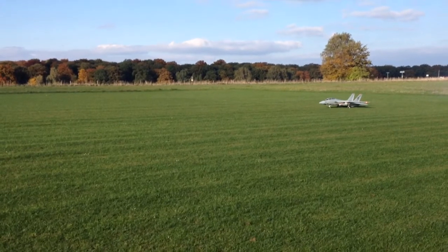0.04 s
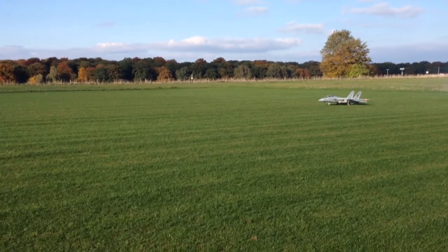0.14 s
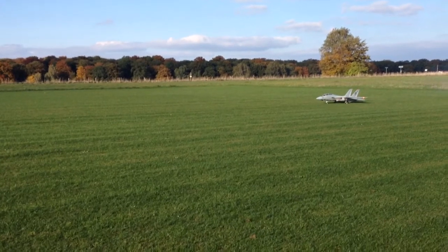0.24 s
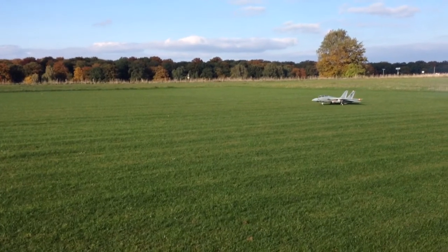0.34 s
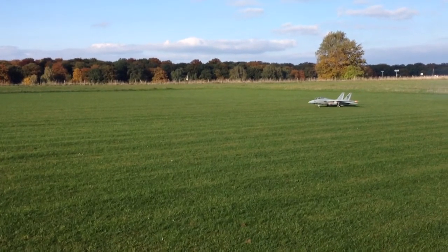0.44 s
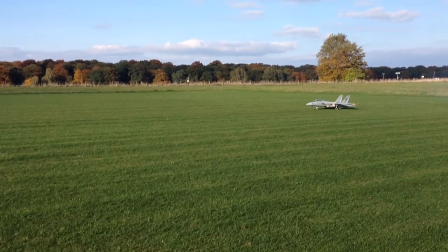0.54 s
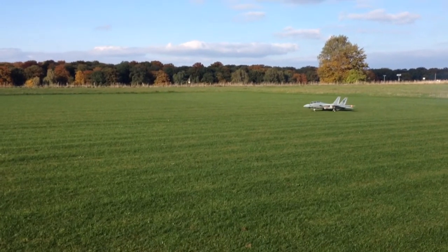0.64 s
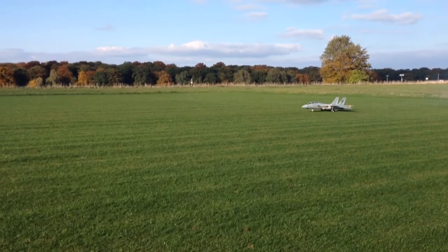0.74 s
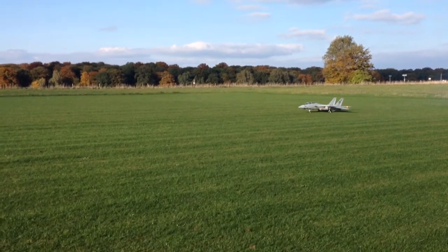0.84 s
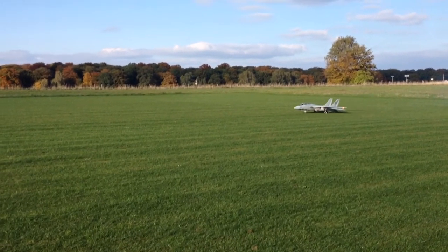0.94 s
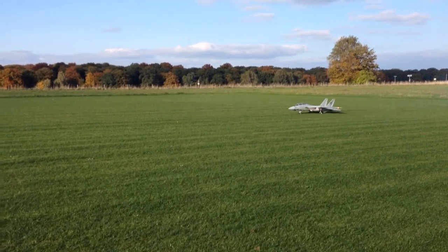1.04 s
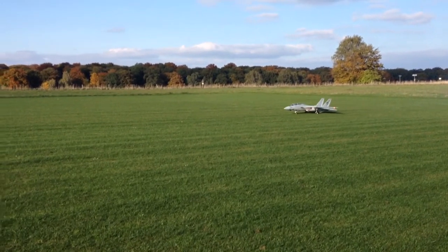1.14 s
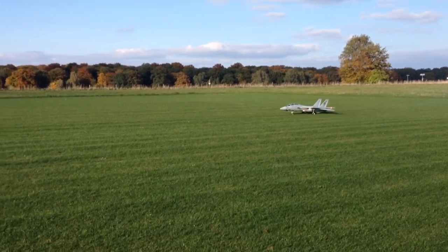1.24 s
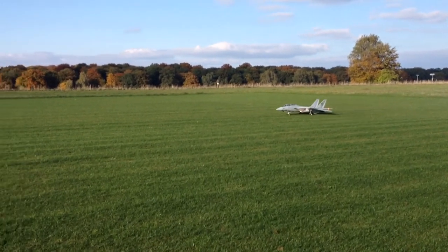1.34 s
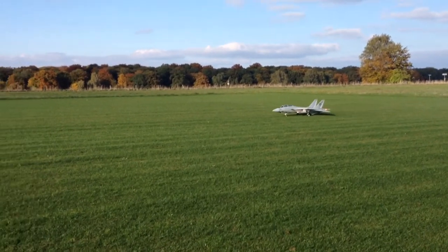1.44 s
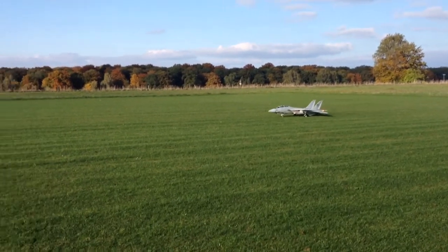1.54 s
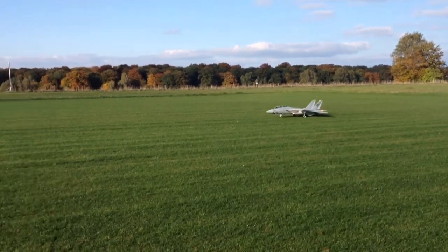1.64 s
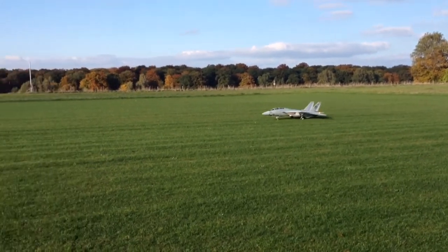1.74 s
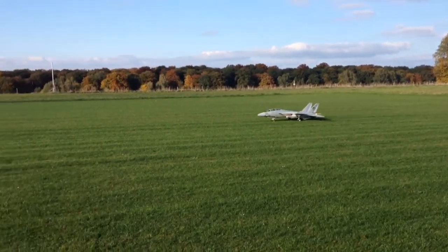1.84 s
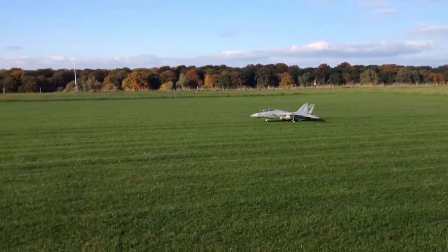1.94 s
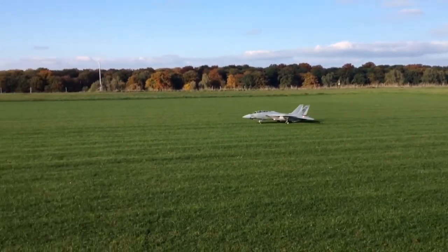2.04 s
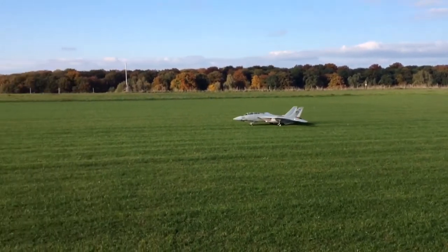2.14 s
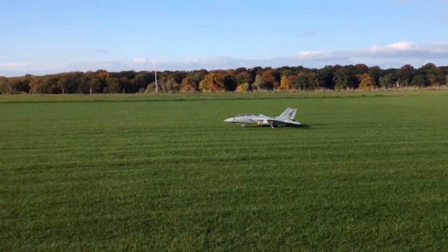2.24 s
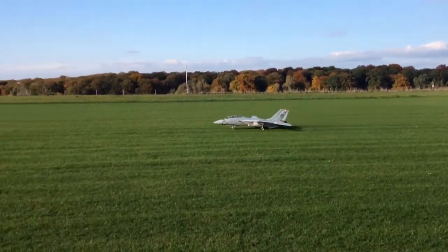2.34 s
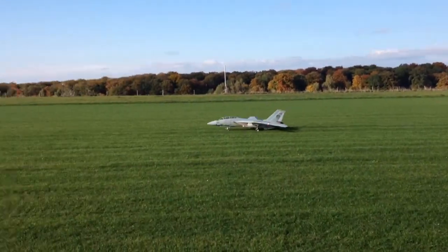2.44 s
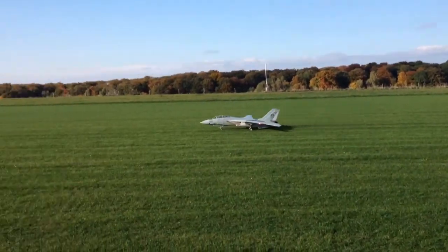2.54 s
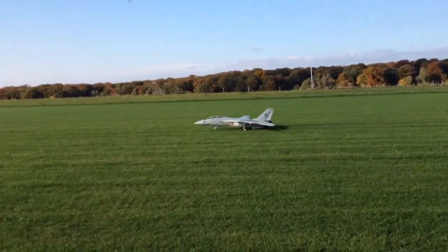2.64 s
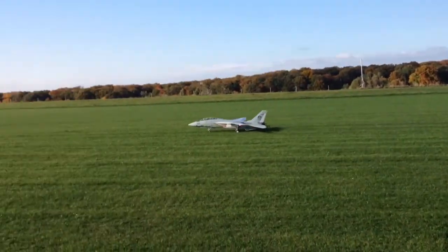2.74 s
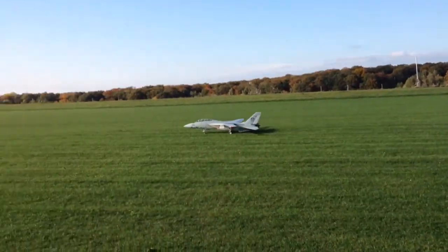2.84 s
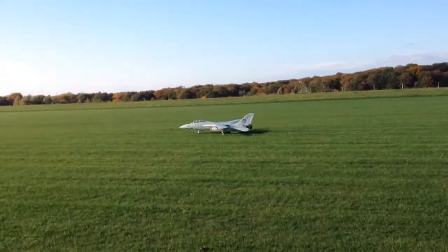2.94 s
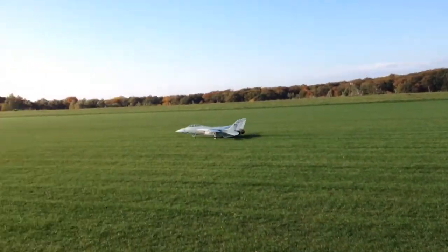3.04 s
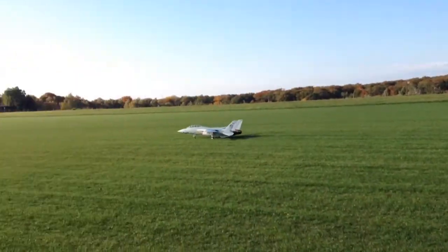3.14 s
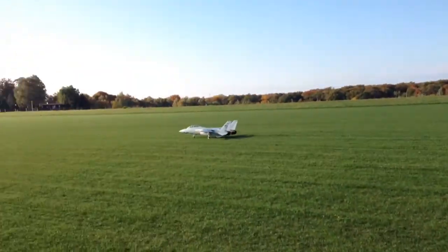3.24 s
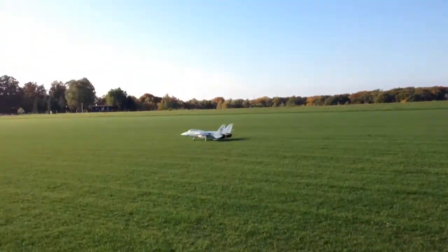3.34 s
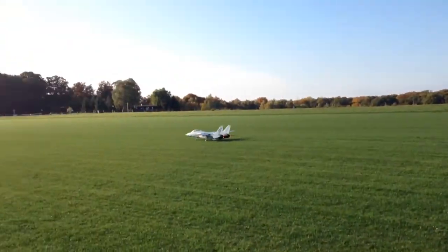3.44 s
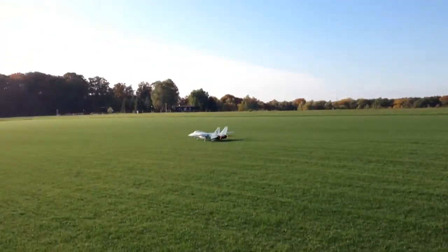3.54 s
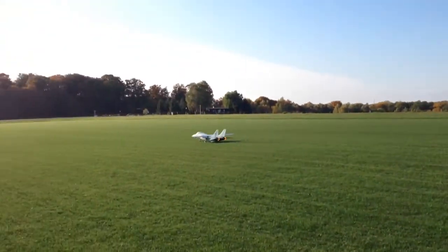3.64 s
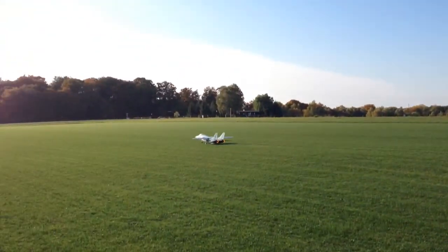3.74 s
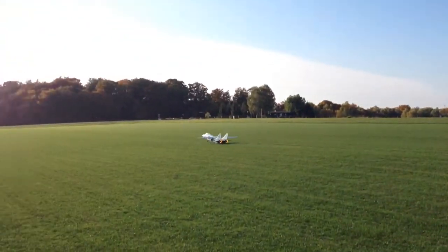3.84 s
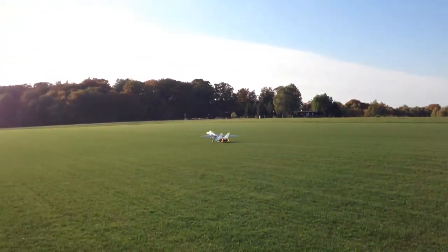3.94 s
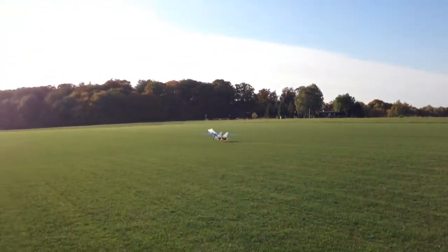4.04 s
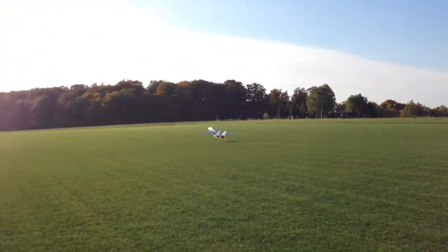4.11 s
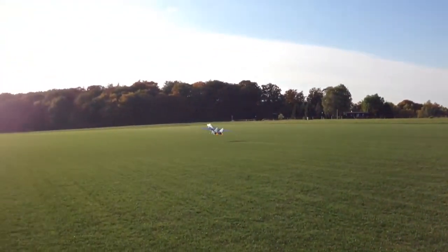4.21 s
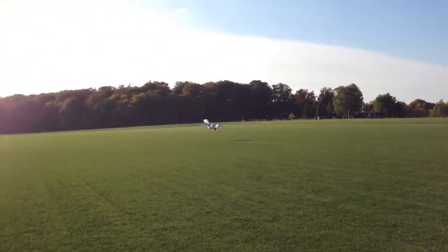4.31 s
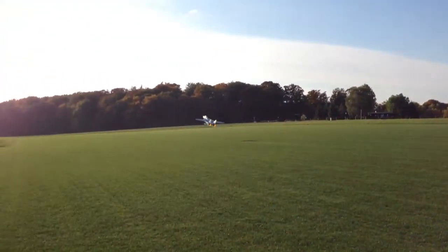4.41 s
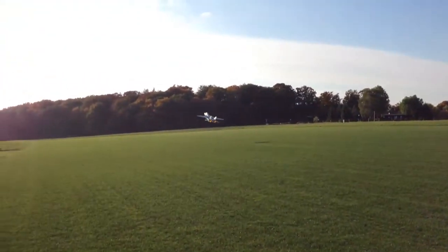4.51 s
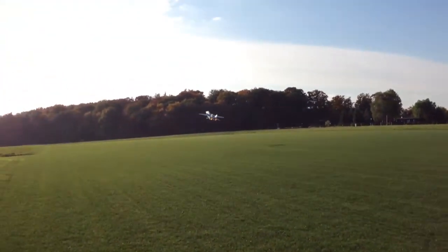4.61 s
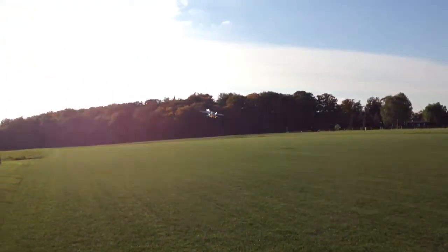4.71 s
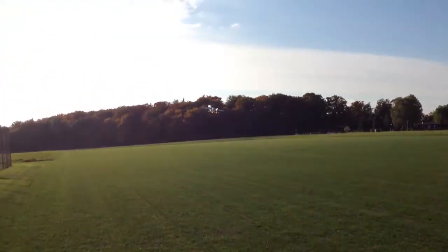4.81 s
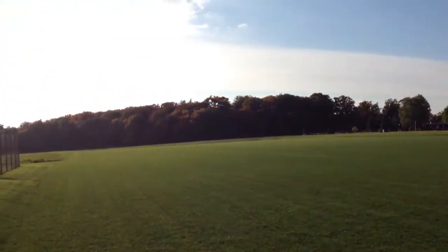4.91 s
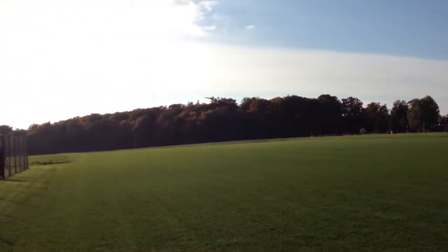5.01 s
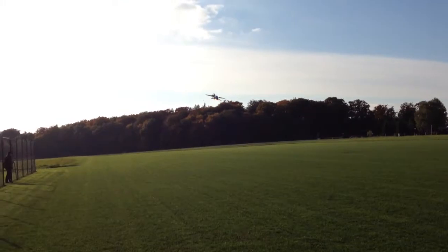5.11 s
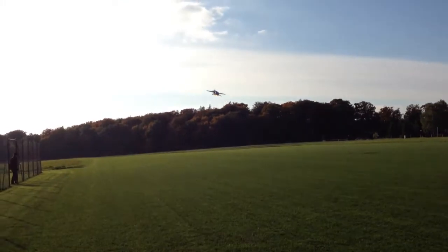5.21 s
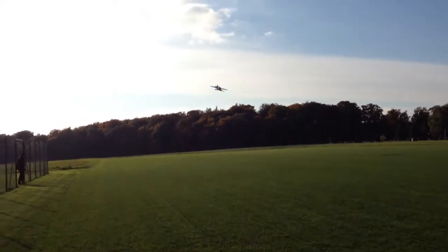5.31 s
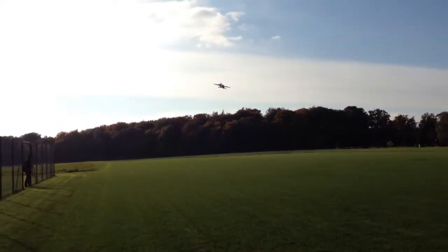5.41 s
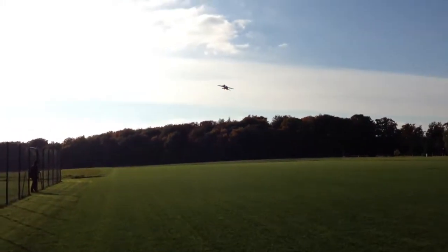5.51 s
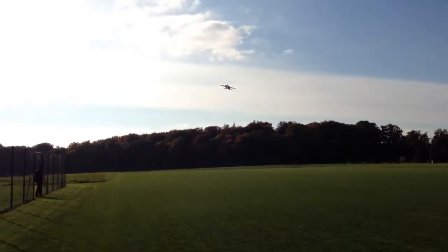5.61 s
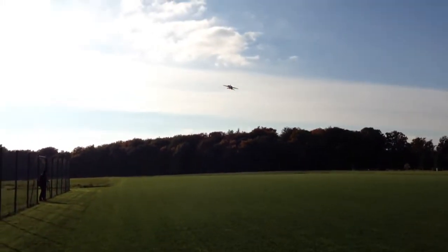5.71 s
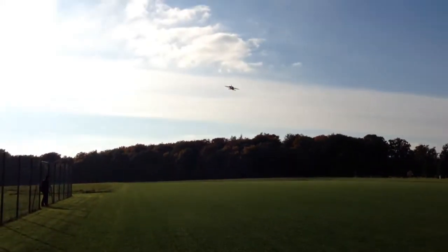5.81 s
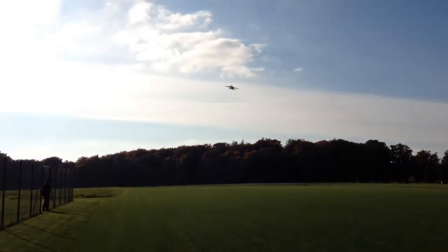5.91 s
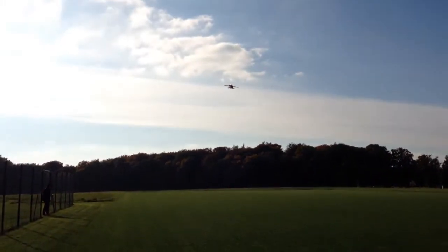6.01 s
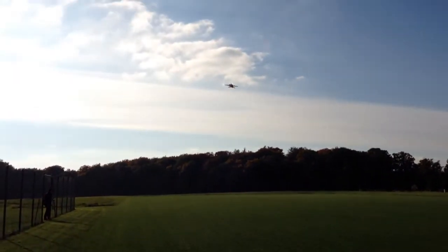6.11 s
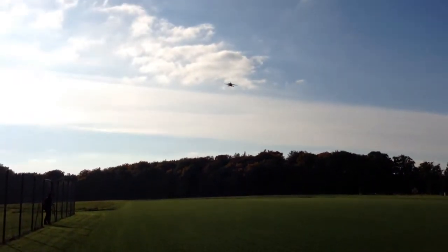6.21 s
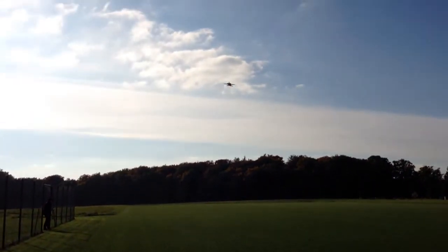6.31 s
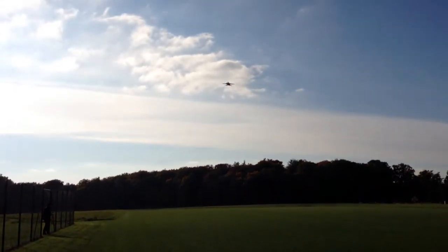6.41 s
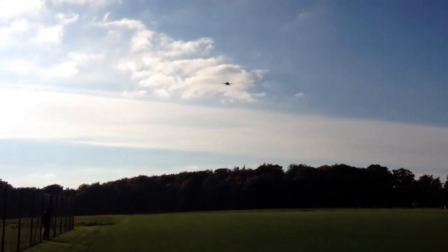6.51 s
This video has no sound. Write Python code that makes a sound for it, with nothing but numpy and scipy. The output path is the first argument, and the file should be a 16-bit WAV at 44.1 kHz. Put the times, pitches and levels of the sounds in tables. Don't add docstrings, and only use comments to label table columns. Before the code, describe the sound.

At 0 s a small twin-turbine model jet is already running on open grass: a dense airy hiss over a modest exhaust rumble, with a needle-thin whine climbing quickly from about 8.5 kHz to 13 kHz by 1 s and levelling near 14 kHz by 2 s. It flickers in the moving air; a fainter second whine joins around 1.1 s. Both fade by 2.9 s. Wheels drum softly and low on turf, most around 2.4 s. The hiss is brightest near 3 s as it passes. From 3.5 s the tail faces the listener and the roar deepens, swelling around 4.1 s at lift-off, with only a very faint, slightly lower whine afterwards. From 4.5 to 6.5 s the jet climbs away, hiss dulling and wavering in gusts, roar easing, hollow comb tones sliding downward. Mono handheld microphone, band-limited treble, patchy compressed texture; the sound continues to the end.

```python
import sys
import numpy as np
from scipy import signal
from scipy.io import wavfile
from scipy.ndimage import uniform_filter1d, map_coordinates

SR = 44100
rng = np.random.default_rng(int(sys.argv[2]) if len(sys.argv) > 2 else 0)


def voltage_ratio(level):
    return 10 ** (np.asarray(level, float) / 20)


def pcm_store(signal):
    levels = np.round(np.clip(np.atleast_2d(signal), -1, 1) * 32767)
    wavfile.write(sys.argv[1], SR, levels.astype(np.int16).T)


N = 289336
FRAME = 1024

# (time [s], pitch [Hz])
BLADE_PITCH = [(0, 8550), (.2, 9700), (.33, 10500), (.47, 11280), (.63, 11840), (1.01, 12920),
               (1.34, 13740), (1.45, 13930), (1.58, 14035), (1.7, 14090), (1.9, 14140), (2.75, 14170),
               (4.1, 13310), (4.7, 13210), (6.56, 13050)]
# (time [s], loudness from distance [dB], aspect [0 nose-on, 1 tail-on])
FLYBY = [(0, 0, 0.18), (.25, 0.5, 0.24), (.7, -3, 0), (1.1, -1, 0.028), (1.6, -1, 0.05), (2.1, 0, 0.11),
         (2.6, 1, 0), (3.1, 0, 0), (3.35, 0.5, 0.032), (3.6, 0.5, 0.73), (3.9, 0, 0.8), (4.15, -1, 0.73),
         (4.4, 1.5, 0.78), (4.7, -1, 1.07), (5.1, -2, 0.93), (5.6, -4, 1.1), (6.1, -4, 1.1),
         (6.56, -4.5, 1.06)]
# (time [s], level [dB], half width [s])
AIR_SWELLS = [(.62, -0.5, .08), (1.22, 1.5, 0.064), (1.83, -1.5, 0.095), (2.15, 1, 0.066),
              (2.34, -1, 0.058), (2.57, 0.5, 0.088), (2.7, -2, 0.091), (3, -2.5, 0.021), (3.08, 1, .03),
              (3.4, -2, 0.032), (3.98, 1.5, .05), (4.15, -2, .06), (4.35, 1.5, 0.05), (4.77, -1, .06),
              (4.88, 3.5, 0.085), (5.1, -1.5, 0.073), (5.37, 1, 0.063), (5.94, -2.5, .07), (6.16, 2, 0.03),
              (6.55, 3, 0.074)]


def unit(x):
    return x / np.sqrt(np.mean(np.abs(x) ** 2) + 1e-20)


def along(points, hz):
    f, v = np.transpose(points)
    return np.interp(np.log(hz + 1), np.log(f + 1), v)


def curves(rows, t):
    s, *cols = np.transpose(rows)
    return [np.interp(t, s, c) for c in cols]


def bumps(rows, t):
    return sum(db * np.exp(-((t - s) / width) ** 2) for s, db, width in rows)


def wobble(rate, t):
    return map_coordinates(rng.standard_normal(2000), [t * rate])


def shaped(x, gain):
    overlap = FRAME * 3 // 4
    hz, t, z = signal.stft(x, SR, nperseg=FRAME, noverlap=overlap)
    z = z * gain(hz[:, None], t)
    return signal.istft(z, SR, nperseg=FRAME, noverlap=overlap)[1][:N]


def rush(level_db, patchy_db, flutter_db):
    def gain(hz, t):
        field = rng.standard_normal((len(hz), len(t)))
        field = uniform_filter1d(field, size=14, axis=0)
        field = uniform_filter1d(field, size=10, axis=1)
        return voltage_ratio(level_db(hz, t) + patchy_db * unit(field) + flutter_db * wobble(8.2, t))
    return shaped(rng.standard_normal(N), gain)


def spool_db(t):
    hz = np.maximum.accumulate(curves(BLADE_PITCH, t)[0])
    return 20 * np.log10(hz / hz[-1])


def exhaust():
    # (frequency [Hz], level [dB])
    rumble_colour = [(25, -58), (60, -63), (100, -41.5), (150, 1.5), (220, 3.5), (300, 1), (450, -2.5),
                     (700, -36), (1200, -100)]
    roar_colour = [(60, -100), (150, -45), (300, -9), (400, 0), (500, 3), (750, -2.5), (1100, -6),
                   (1600, -13), (2200, -18), (4000, -23.5), (8000, -100)]
    beam_s, beam_width_s = 4.14, 0.3
    pipe_hz, pipe_octaves = 490, 0.15

    def jet_db(t):
        near_db, aspect = curves(FLYBY, t)
        return near_db + 6 * aspect + bumps([(beam_s, 3, beam_width_s)], t)

    def rumble_db(hz, t):
        power_db = 0.68 * spool_db(t)
        thinning_db = -8 * np.maximum(t - 6.1, 0)
        return along(rumble_colour, hz) + 0.64 * jet_db(t) - 13 + power_db + thinning_db

    def roar_db(hz, t):
        dull_db = bumps([(beam_s - 0.09, -6.5, beam_width_s)], t)
        bite_db = 0.5 + 2 * spool_db(t) + dull_db + 0.18 * bumps(AIR_SWELLS, t)
        pipe_shape = np.exp(-(np.log2((hz + 1) / pipe_hz) / pipe_octaves) ** 2)
        pipe_db = -0.63 * spool_db(t) * pipe_shape
        octaves_up = np.clip(np.log2((hz + 1) / 550), 0, 1.3)
        return along(roar_colour, hz) + jet_db(t) - 7 + pipe_db + bite_db * octaves_up

    rumble = rush(rumble_db, patchy_db=-0.2, flutter_db=-2.5)
    return rumble + rush(roar_db, patchy_db=.4, flutter_db=.15)


def intake():
    # (frequency [Hz], level [dB])
    hiss_colour = [(400, -100), (1200, -17), (2000, -1.5), (2900, 1.5), (4000, -1), (5000, 3), (6200, -3),
                   (7500, -6), (9000, -10), (11000, -13.5), (13000, -20.5), (15300, -22)]
    head_on = [(1500, 3.5), (2300, -1.5), (2950, -0.5), (3500, -5), (4200, -2), (4700, 10), (5000, -0.5),
               (6000, 3), (8000, 1)]

    def level_db(hz, t):
        near_db, aspect = curves(FLYBY, t)
        hiss_db = near_db - 11.5 * aspect + 3.44 * spool_db(t) + bumps(AIR_SWELLS, t)
        absorbed_db = -4 * np.maximum(t - 3.82, 0)
        treble_db = -0.86 * spool_db(t) + 5.5 * aspect + absorbed_db
        abeam_db = bumps([(3.04, 2.5, 0.31)], t)
        tilt = np.clip((hz - 4500) / 4200, 0, 2.7)
        dulling_db = (treble_db - .6 + abeam_db) * tilt
        facing = np.clip((3 - t) / 1.4, 0, 1)
        return along(hiss_colour, hz) + facing * along(head_on, hz) + hiss_db - 9.5 + dulling_db
    return rush(level_db, patchy_db=1.09, flutter_db=-0.23)


def wheels():
    # (frequency [Hz], level [dB])
    turf_colour = [(25, -30), (60, -35), (110, 1), (170, 11), (300, -40), (600, -100)]
    # (time [s], level [dB])
    drumming = [
        (0, -51),
        (1.5, -52),
        (2.4, -43),
        (2.9, -49.5),
        (3.6, -72),
        (6.56, -74),
    ]
    return rush(lambda hz, t: along(turf_colour, hz) + curves(drumming, t)[0] + 23,
                patchy_db=-3.5, flutter_db=3.0)


def whine(heard, ratio=1, lag_s=0, fades=(), shimmer_db=3, drift_hz=15):
    t = np.arange(N) / SR
    hz = ratio * curves(BLADE_PITCH, t - lag_s)[0]
    edge_db = -22
    db = heard[-1] + np.interp(t, heard[:-1], [edge_db, 0, 0, edge_db]) + bumps(fades, t)
    sounding = (t >= heard[0]) & (t < heard[-2])
    phase = 2 * np.pi * np.cumsum(hz + drift_hz * wobble(42, t)) / SR
    return sounding * np.sqrt(2) * voltage_ratio(db + shimmer_db * wobble(44.6, t)) * np.sin(phase)


def compressors():
    # (time [s], level [dB], half width [s])
    near_fades = [(.17, -4, .1), (.52, -11, .1), (.7, -2, .06), (.93, -9, .05), (1.05, -3, .08),
                  (1.41, -4, .04), (1.6, 2, .15), (1.9, -7, .07), (2.27, -7, .12)]
    far_fades = [(1.32, 4, .08), (1.48, -6, .04), (1.78, -15, .1), (2.16, 3, .08)]
    near = whine((0, .33, 2.1, 2.9, -32), fades=near_fades, shimmer_db=3.5, drift_hz=10)
    far = whine((1.1, 1.25, 2.5, 2.75, -47), ratio=1.028, lag_s=.03, fades=far_fades)
    leaving = whine((4.1, 4.35, 4.36, 6.9, -54))
    blade_count = 7
    sideband = whine((1.42, 1.5, 1.7, 1.78, -50), ratio=1 - 1 / blade_count)
    return near + far + leaving + sideband


def grass(hz, t):
    # (frequency [Hz], level [dB])
    turf_loss = [(200, 0), (800, -1), (1400, -3.5), (2200, -11), (4000, -8), (8000, -16), (15000, -30)]
    # (frequency [Hz], factor on the lag)
    soft_soil = [(300, 1.1), (750, 1.7), (1500, 1.5), (3000, 1)]
    # (time [s], extra path [ms], phase lag [rad], share reflected [0-1])
    bounce = [
        (0, 0.27, 0.6, 0.16),
        (1.5, 0.097, 0.6, 0.38),
        (3, 0.16, 0.61, 0.18),
        (3.5, 0.22, 0.48, 0.64),
        (3.9, 0.15, 0.41, 0.56),
        (4.15, 0.23, 0.7, 0.54),
    ]
    ms, lag, share = curves(bounce, t)
    aloft = np.maximum(t - 4.17, 0)
    pull_up_s = .1
    climb_s = aloft - pull_up_s * (1 - np.exp(-aloft / pull_up_s))
    ms = ms + .9 * climb_s
    lag = lag - .16 * aloft
    share = share + .35 * np.tanh(aloft / 0.19)
    echo = np.clip(share, 0, .95) * voltage_ratio(along(turf_loss, hz))
    phase = 2 * np.pi * hz * ms / 1000 + lag * along(soft_soil, hz)
    return (1 + echo * np.exp(-1j * phase)) / np.sqrt(1 + echo ** 2)


def surface(hz, t):
    # (facing right [Hz], share reflected [0-1], facing left [Hz], share reflected [0-1])
    notches = [(1995, .97, 2210, .5), (4560, .62, 4610, .68), (6670, .76, 7120, .66),
               (8930, .68, 9520, .76), (11280, .68, 11980, .82), (13000, .4, 14020, .93),
               (15700, .7, 16400, .8)]
    # (time [s], right to left [0-1])
    camera_swing = [
        (0, 0.06),
        (1.8, 0.07),
        (2.5, 0.12),
        (3, 0.44),
        (3.6, 0.4),
        (4.2, 0.87),
        (5, 0.87),
        (6.56, 0.96),
    ]
    swing = np.clip(curves(camera_swing, t)[0], 0, 1)
    right_hz, right_share, left_hz, left_share = np.transpose([(0, 0.0068, 0, 0.089)] + notches)

    def blend(right, left):
        facing_right = np.interp(hz, right_hz, right)
        facing_left = np.interp(hz, left_hz, left)
        return (1 - swing) * facing_right + swing * facing_left

    order = np.arange(len(right_hz))
    turns = blend(order, order)
    echo = blend(right_share, left_share)
    return (1 - echo * np.exp(-2j * np.pi * turns)) / np.sqrt(1 + echo ** 2)


def scene():
    air = shaped(exhaust() + intake(), lambda hz, t: grass(hz, t) * surface(hz, t))
    return np.array([air + compressors() + wheels()] * 2)


def thin_bands(x):
    # (frequency [Hz], level against the neighbourhood [dB])
    masking = [(1000, -40), (2000, -17), (4500, -14), (7000, -14), (9000, -11), (11500, -8), (14000, -5)]
    # (start [s], end [s], only tones are kept above [Hz])
    dull_spells = [
        (.65, .89, 12600),
        (1.03, 1.86, 12700),
        (1.86, 2.6, 14800),
    ]
    hz, t, z = signal.stft(x, SR, nperseg=2 * FRAME)
    bin_hz = hz[:-1, None]
    power = np.abs(z[:-1]) ** 2
    groups = power.reshape(-1, 4, len(t))
    fickle = voltage_ratio(4 * rng.standard_normal((len(groups), len(t))))
    band = np.repeat(uniform_filter1d(groups.mean(1), size=3, axis=0) * fickle, 4, axis=0)
    around = uniform_filter1d(uniform_filter1d(power, size=110, axis=0), size=3, axis=1)
    keep = band > around * voltage_ratio(2 * along(masking, bin_hz))
    spells = [(t > start) & (t <= end) for start, end, _ in dull_spells]
    edge_hz = np.select(spells, [top for *_, top in dull_spells], 15150)
    edge_hz = edge_hz + 200 * rng.standard_normal(len(t))
    tonal = np.repeat(groups.max(1), 4, axis=0) > voltage_ratio(-2 * 54)
    keep &= (bin_hz < edge_hz) | tonal
    z[:-1] *= keep
    return signal.istft(z, SR, nperseg=2 * FRAME)[1][:N]


def band_limit(x):
    return signal.sosfilt(signal.butter(12, 15230, fs=SR, output="sos"), x)


def record(dry):
    soft = dry[0] / (1 + np.abs(dry[0] / .8) ** 6) ** (1 / 6)
    mix = np.array([thin_bands(soft)] * 2)
    return band_limit(mix)


dry = scene()
out = record(dry)
pcm_store(out)
```